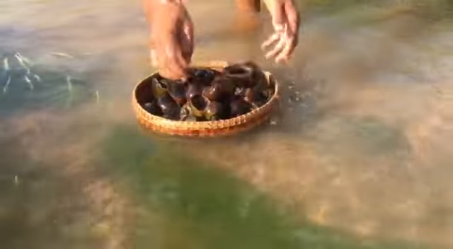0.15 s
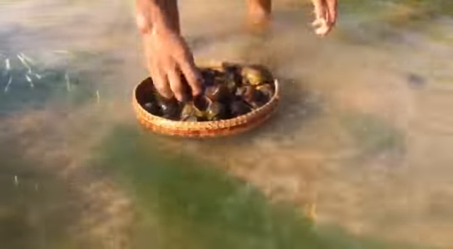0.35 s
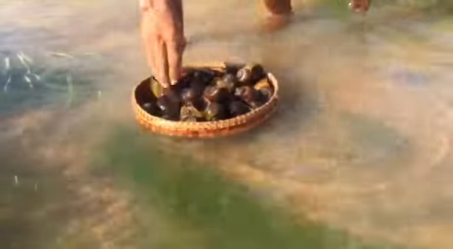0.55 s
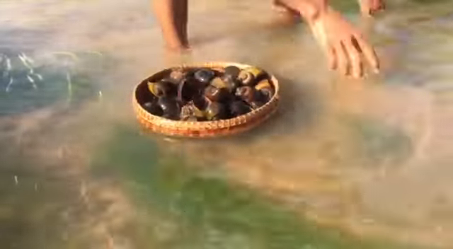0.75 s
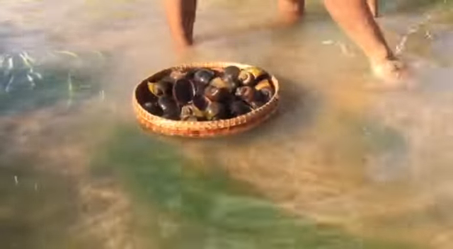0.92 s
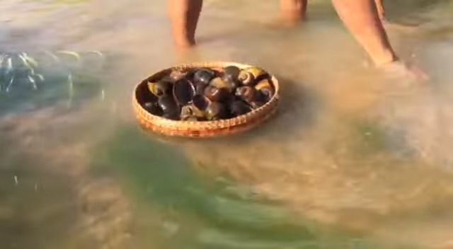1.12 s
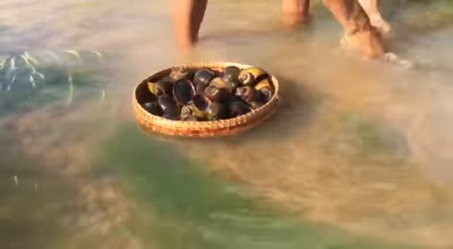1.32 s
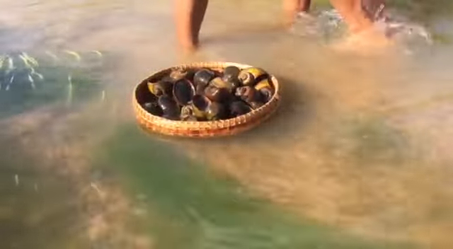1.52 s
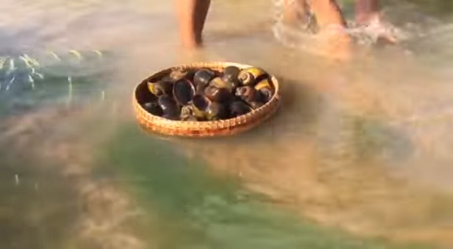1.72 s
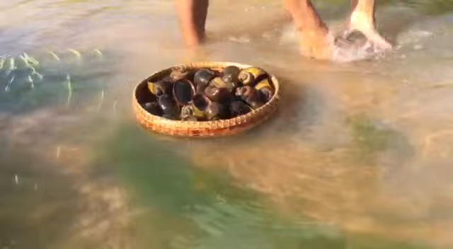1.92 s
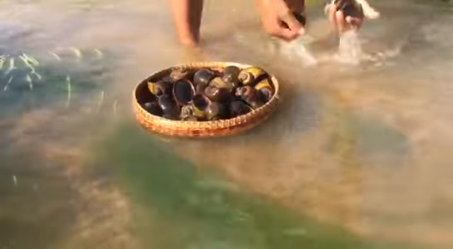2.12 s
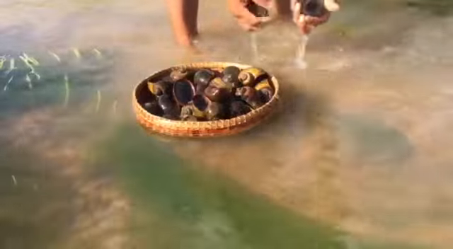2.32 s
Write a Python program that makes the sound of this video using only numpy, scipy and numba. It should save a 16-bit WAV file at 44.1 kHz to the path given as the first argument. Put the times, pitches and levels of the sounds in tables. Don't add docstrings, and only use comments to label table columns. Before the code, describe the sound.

Light droplets tick at first. From 0.22 to 0.32 seconds wet shells clack loudly in a basket, hollow and hard, with another knock near 0.49 and smaller rattles until 0.77. Hands plip into shallow water around 0.9, then it nearly hushes from 1.1 to 1.45. Sloshing, slaps and bubbly plops build from 1.55, strongest 1.7 to 2.0, thinning to drips by 2.35. Faint distant rumble and air throughout.

```python
import sys
import numpy as np
from scipy import signal
from scipy.fft import rfft, irfft
from scipy.io import wavfile
from scipy.ndimage import uniform_filter1d
from numba import njit

SR = 44100
rng = np.random.default_rng(int(sys.argv[2]) if len(sys.argv) > 2 else 0)


def volts_from_decibels(level):
    exponent = np.asarray(level, float) / 20
    return 10 ** exponent


def put_to_file(sound):
    columns = np.atleast_2d(sound).T
    safe = np.clip(columns, -1, 1)
    whole_steps = np.round(safe * 32767)
    wavfile.write(sys.argv[1], SR, whole_steps.astype(np.int16))


N = 103635

# frequency in Hz, density in dB.
AIR_SPECTRUM = [(200, -7), (700, -19), (1200, -30.5), (9800, -26)]
# frequency in Hz, density in dB.
RUMBLE_SPECTRUM = [(15, -63.5), (35, -28), (55, -2.5), (114, 2), (135, -5.5), (173, -11), (205, -29),
                   (340, -52)]
# frequency in Hz, density in dB per Hz.
SLOSH_SPECTRUM = [(200, -16), (450, -5), (1200, -5.5), (2540, -9), (8500, -21.5), (9800, -20.5)]
# start in seconds, peak level in dB, fade in seconds.
HAND_SHOVES = [
    (.88, -42.5, 0.07),
    (1.664, -39, 0.055),
    (1.759, -38.5, 0.038),
    (1.84, -36.5, .025),
]
# start in seconds, peak level in dB, pitch in Hz.
RISING_DRIPS = [(0.772, -29, 1213), (0.922, -21, 872), (0.957, -22.5, 1480), (1.249, -39.5, 947),
                (1.316, -27, 1536), (1.359, -41, 980), (1.449, -30.5, 1095), (1.482, -34.5, 1090),
                (1.54, -21.5, 1595), (1.553, -26, 850), (1.579, -23, 1124), (1.622, -13, 804),
                (1.688, -14, 1052), (1.705, -11.5, 1250), (1.834, -14.5, 2566), (1.926, -18.5, 1990),
                (1.973, -18, 1550), (2.007, -22, 1050), (2.045, -24, 1140), (2.066, -23.5, 1140),
                (2.119, -27, 990), (2.149, -28, 1480), (2.163, -28, 1510), (2.192, -34, 1180),
                (2.307, -26.5, 1004)]
# start in seconds, peak level in dB, pitch in Hz,
# ring T60 in seconds.
AIR_POCKETS = [(.07, -54, 602, 0.15), (0.6301, -15.5, 2490, 0.024), (.69, -41, 768, 0.074),
               (.795, -35.5, 900, 0.059), (.817, -38, 4170, 0.015), (.82, -39.5, 830, 0.056),
               (.845, -46.5, 739, 0.093), (0.884, -33.5, 415, 0.065), (.913, -24, 2114, 0.029),
               (0.976, -29.5, 3860, 0.012), (.998, -34, 582, 0.11), (1.025, -28.5, 3350, 0.012),
               (1.015, -38, 2030, 0.032), (1.075, -31, 1976, 0.018), (1.091, -44.5, 1975, 0.061),
               (1.312, -47.5, 860, 0.1), (1.43, -49.5, 591, 1), (1.469, -50, 1427, 0.66),
               (1.515, -37.5, 628, 0.066), (1.715, -36.5, 369.3, 0.19), (1.845, -28, 504, 0.054),
               (2.05, -31.5, 795, 0.072), (2.087, -43, 495, 0.075), (2.108, -39, 606, 0.062),
               (2.162, -34, 765, 0.03), (2.336, -34, 1180, 0.03)]
# start in seconds, peak level in dB, pitch in Hz,
# ring T60 in seconds.
DROPLET_HITS = [(.002, -31.5, 3230, 0.0082), (.008, -28.5, 2200, 0.014), (0.032, -39, 1730, 0.014),
                (.043, -31.5, 2180, 0.019), (.055, -44, 4160, .012), (.142, -39.5, 2830, 0.024),
                (.143, -44, 8900, 0.011), (0.176, -34.5, 1850, 0.017), (.18, -35.5, 2490, 0.032),
                (.19, -41, 3450, 0.026), (.19, -44.5, 1230, 0.022), (0.8175, -32, 5500, 0.017),
                (.847, -40, 9050, .015), (0.856, -31.5, 5460, .015), (.86, -30.5, 8600, 0.009),
                (0.878, -21, 2690, 0.0085), (0.9075, -30, 3000, 0.031), (.929, -20, 3620, .014),
                (.939, -19, 3800, 0.014), (.932, -20.5, 900, 0.016), (1.061, -34, 1520, 0.0072),
                (1.555, -47, 3760, 0.0079), (1.567, -24.5, 1033, 0.044), (1.576, -41, 4000, 0.0098),
                (1.596, -34, 3200, .014), (1.632, -17.5, 1080, 0.013), (1.6678, -29.5, 4260, 0.011),
                (1.762, -17, 3520, 0.01), (1.763, -18, 1890, 0.028), (1.814, -48, 1070, 0.029),
                (1.844, -19.5, 1485, 0.019), (1.889, -30, 1280, .02), (1.937, -24.5, 2610, 0.034),
                (1.953, -13, 833, 0.021), (1.964, -21, 757, 0.036), (1.988, -21, 1490, 0.024),
                (2.031, -36, 1720, 0.012), (2.048, -42, 3320, 0.011), (2.066, -31.5, 730, 0.017),
                (2.087, -27.5, 3400, .012), (2.107, -28.5, 1000, 0.015), (2.121, -28, 2670, 0.014),
                (2.273, -44, 1265, 0.073), (2.29, -36, 2290, 0.02), (2.336, -36, 3400, .012)]
# time in seconds, effort in dB, deep gurgle in dB re effort,
# spray in dB re effort.
STIR_EFFORT = [
    (.04, -54.5, -27, 9.5),
    (.09, -66, -36, 4),
    (.19, -60.5, -6, 12),
    (.36, -73, 16.5, -47),
    (.41, -38, -1.5, -5),
    (.47, -78.5, 20.5, 2),
    (.56, -55.5, 10.5, -32),
    (.73, -70.5, 13.5, -19.5),
    (.78, -53.5, -5, -8),
]
# time in seconds, effort in dB, deep gurgle in dB re effort, spray in dB re effort.
PLUNGE_EFFORT = [
    (.85, -72, 9, 13),
    (0.894, -54, 3, 22),
    (0.932, -40, 2.5, 3),
    (0.992, -54, 8, -33),
    (1.073, -65.5, 17.5, -1.5),
    (1.121, -67.5, -7.5, 7.5),
    (1.382, -78.5, 20.5, -35),
]
# time in seconds, effort in dB, deep gurgle in dB re effort,
# spray in dB re effort.
RINSE_EFFORT = [
    (1.46, -52, -10, -20),
    (1.52, -67.5, 17.5, 2),
    (1.561, -47.5, 2.5, -3),
    (1.652, -42.5, -1.5, 0),
    (1.72, -38.5, 2, -16),
    (1.899, -44.5, 3, 8.5),
    (2.0, -39, -0.5, -9),
    (2.15, -44.5, -26, -1.5),
    (2.35, -59, -11, 4.5),
]
# start in seconds, peak level in dB.
WATER_SLAPS = [(0.856, -41), (0.8778, -26), (0.9143, -24), (0.93, -47), (1.0259, -28), (1.0595, -30),
               (1.535, -33), (1.555, -27.5), (1.576, -35), (1.5944, -19.5), (1.669, -39), (1.703, -18),
               (1.7613, -16), (1.837, -13), (1.9175, -38), (1.935, -18.5), (1.966, -26), (2.047, -26.5),
               (2.0652, -27), (2.084, -25), (2.236, -49), (2.334, -34)]
# start in seconds, peak level in dB, ring pitch in Hz, crack in dB re ring.
SHELL_KNOCKS = [(0.2237, -12.5, 1830, 6.5), (0.2405, -13.5, 1560, -6.5), (0.2426, -5.5, 1240, -24),
                (0.2448, -10.5, 2070, -45), (0.256, -36, 2260, -30), (0.261, -26.5, 980, -25),
                (0.2981, -11, 1610, -15.5), (0.3138, -23, 1610, -28), (0.379, -40, 2200, 16),
                (0.3908, -24, 780, -3), (0.401, -29.5, 1570, -5.5), (0.407, -25, 2520, -8.5),
                (.438, -32, 1280, -12), (0.4914, -14, 1660, -23), (0.5253, -26.5, 1060, -29),
                (.541, -28.5, 1370, -30), (0.572, -31, 1200, -29), (0.592, -26, 1380, -30),
                (0.606, -26.5, 2580, -11.5), (0.611, -31, 790, -30), (0.619, -22, 2360, -7),
                (0.6311, -22.5, 2970, 0), (0.666, -33, 1290, -9), (0.688, -36.5, 1450, -36),
                (.757, -35, 1160, 4), (.765, -26, 2320, -13)]


def unit(x):
    return x / np.sqrt(np.mean(x ** 2))


def shape(table, at_hz):
    points = np.array(table, float)
    return np.interp(np.log(at_hz), np.log(points[:, 0]), points[:, 1])


def coloured(table):
    hz = np.maximum(np.arange(N // 2 + 1) * SR / N, 1)
    gain = volts_from_decibels(shape(table, hz)) * (hz > table[0][0])
    return unit(irfft(rfft(rng.standard_normal(N)) * gain, N))


def patchy(rate):
    hold = int(SR / rate)
    steps = np.repeat(rng.standard_normal(N // hold + 1), hold)
    return uniform_filter1d(steps, hold)[:N] * 2.01


@njit
def rings(n, s, hz, t60, size, rise, attack, sr):
    out = np.zeros(n)
    for k in range(len(s)):
        first, phase, level, closed = int(s[k] * sr), 0., size[k], 1.
        fall = np.exp(-6.908 / (t60[k] * sr))
        opening = np.exp(-1 / (attack[k] * sr))
        span = .6 * t60[k] * sr
        for j in range(min(int(span), n - first)):
            phase += 2 * np.pi * min(hz[k] * (1 + rise[k] * j / sr), .45 * sr) / sr
            level, closed = level * fall, closed * opening
            out[first + j] += level * (1 - closed) * (1 - (j / span) ** 2) * np.sin(phase)
    return out


def ring(s, hz, t60, size, rise=0., attack=1e-4):
    columns = np.broadcast_arrays(s, hz, np.maximum(t60, 1e-3), size, rise, attack)
    s, hz, t60, size, rise, attack = (np.ascontiguousarray(v, float).ravel() for v in columns)
    return rings(N, s, hz, t60, size, rise, attack, float(SR))


def bursts(s, db, fall_s, rise_s):
    t, env = np.arange(N) / SR, 0
    for start, gain, fall in zip(*np.broadcast_arrays(s, volts_from_decibels(db), fall_s)):
        since = np.clip(t - start, 0, None)
        env = env + gain * (1 - np.exp(-since / rise_s)) * np.exp(-since / fall)
    return env


def grains(count, lo_hz, hi_hz, cycles, spread_db, glide):
    when, pitch, loud, length = rng.random((count, 4)).T
    hz = lo_hz * (hi_hz / lo_hz) ** pitch
    t60 = cycles * (.5 + length) / hz
    size = volts_from_decibels(shape(SLOSH_SPECTRUM, hz) - spread_db * np.log(1 - .95 * loud)) * hz
    return unit(ring(when * N / SR, hz, t60, size, glide / t60, 0.66 / hz))


def background():
    return volts_from_decibels(-69) * coloured(AIR_SPECTRUM) + volts_from_decibels(-47.5) * coloured(RUMBLE_SPECTRUM)


def glugs():
    s, db, fade_s = np.array(HAND_SHOVES, float).T
    hollows = grains(count=300, lo_hz=294, hi_hz=523, cycles=14, spread_db=5, glide=0.4)
    return bursts(s, db, fade_s, 0.01) * hollows


def bubbles():
    s, db, hz = np.array(RISING_DRIPS, float).T
    t60 = 0.034 * (1000 / hz) ** 0.4
    drips = ring(s, .93 * hz, t60, volts_from_decibels(db + 2.5), rise=9.4, attack=0.0046)
    s, db, hz, t60 = np.array(AIR_POCKETS, float).T
    return drips + ring(s, hz, t60, volts_from_decibels(db + 3.5), rise=0.41, attack=t60 * 0.054)


def droplets():
    s, db, hz, t60 = np.array(DROPLET_HITS, float).T
    ping = ring(s, hz, t60, volts_from_decibels(db + 2), rise=1, attack=t60 * 0.096)
    tick = ring(s, 1.15 * hz, 0.005, volts_from_decibels(db - 10))
    neighbour = ring(s + 0.002964, 0.876 * hz, t60, volts_from_decibels(db - 12))
    return ping + tick + neighbour


def water():
    t = np.arange(N) / SR
    moves = np.array([*STIR_EFFORT, *PLUNGE_EFFORT, *RINSE_EFFORT], float)
    effort_db, deep_db, spray_db = (np.interp(t, moves[:, 0], column) for column in moves.T[1:])
    gurgle = grains(count=900, lo_hz=522, hi_hz=1691, cycles=57, spread_db=1.5, glide=0.43)
    drops = grains(count=2200, lo_hz=900, hi_hz=6000, cycles=30, spread_db=3.3, glide=.2)
    fizz = grains(count=2500, lo_hz=900, hi_hz=4900, cycles=5.4, spread_db=3, glide=0.035)
    spray = grains(count=5000, lo_hz=3080, hi_hz=9430, cycles=20.3, spread_db=4.5, glide=0.04)
    spray = spray * volts_from_decibels(2.75 * patchy(59.99))
    deep = volts_from_decibels(-5) * gurgle + volts_from_decibels(-6.5) * coloured(SLOSH_SPECTRUM)
    bright_wash = volts_from_decibels(-9 + 2.55 * patchy(55)) * coloured(SLOSH_SPECTRUM[2:])
    flow = volts_from_decibels(deep_db) * deep + drops + bright_wash
    flow = flow + volts_from_decibels(-11 + 1.6 * patchy(70)) * fizz + volts_from_decibels(-7.5 + spray_db) * spray
    s, db = np.array(WATER_SLAPS, float).T
    gust = drops + fizz + volts_from_decibels(-9.5) * coloured(SLOSH_SPECTRUM) + volts_from_decibels(-2.5) * spray
    return volts_from_decibels(effort_db) * flow + bursts(s, db - 14.5, 0.0069, 0.00063) * gust


def shells():
    s, db, hz, crack_db = np.array(SHELL_KNOCKS, float).T
    u = rng.random((len(s), 3, 6))
    s_col, db_col = s[:, None], db[:, None]
    hollow = ring(s, hz, 0.0096, volts_from_decibels(db), attack=0.00015)
    blow = ring(s, 0.75 * hz, 0.0014, volts_from_decibels(db + 2))
    partner_hz = 560 * 1.36 ** (np.arange(5) + u[:, 1, :5])
    partner_size = volts_from_decibels(db_col - 7) * np.sign(u[:, 2, :5] - .5)
    partners = ring(s_col + 0.00047 * u[:, 0, :5], partner_hz, 0.011, partner_size)
    rattle_s = s_col - 0.021 * np.log(1 - u[:, 2])
    rattle = ring(rattle_s, 800 * 2.94 ** u[:, 0], 0.018, volts_from_decibels(db_col - 12.5) * (1 - u[:, 2]))
    thud = ring(s, 377 * (0.86 + .5 * u[:, 0, 5]), 0.046, volts_from_decibels(db - 19.5), attack=0.0025)
    body_band = signal.butter(3, [600, 2900], "band", fs=SR, output="sos")
    body = signal.sosfilt(body_band, rng.standard_normal(N))
    body = body * (bursts(s, db - 8.5, 0.0058, 0.002) + bursts(s, db - 30.5, 0.023, 0.0015))
    bright_band = signal.butter(2, 4500, "high", fs=SR, output="sos")
    bright = signal.sosfilt(bright_band, rng.standard_normal(N))
    snap = bursts(s, db + crack_db, 0.001, 0.00092)
    snap_tail = bursts(s, db + crack_db - 14.5, 0.0041, 0.0015)
    crack = bright * (snap + snap_tail) + ring(s, 5840, 0.0072, volts_from_decibels(db + crack_db - 8))
    return hollow + blow + partners + rattle + thud + crack + body


def scene():
    near = shells() + bubbles() + droplets() + glugs() + water()
    near = signal.sosfilt(signal.butter(2, 230, "high", fs=SR, output="sos"), near)
    return (near + background())[None]


def edge(x):
    hz = np.arange(N // 2 + 1) * SR / N
    top = irfft(rfft(x) * np.clip((hz - 9000) / 150, 0, 1), N)
    hold = int(0.011 * SR)
    loud = np.sqrt(np.abs(uniform_filter1d(top ** 2, hold))) / volts_from_decibels(-71.5)
    opening = uniform_filter1d(1. * (loud > 1), hold // 2)
    return x - top * (1 - opening)


def band_limit(x):
    return signal.sosfilt(signal.butter(12, 10280, fs=SR, output="sos"), x)


def record(dry):
    dip = signal.lfilter(*signal.iirpeak(4860, 6, fs=SR), dry)
    dipped = dry - 0.37 * dip
    top_cut = signal.ellip(12, .3, 85, 9380, fs=SR, output="sos")
    mix = edge(signal.sosfilt(top_cut, dipped))
    return band_limit(mix)


dry = scene()
out = record(dry)
put_to_file(out)
```